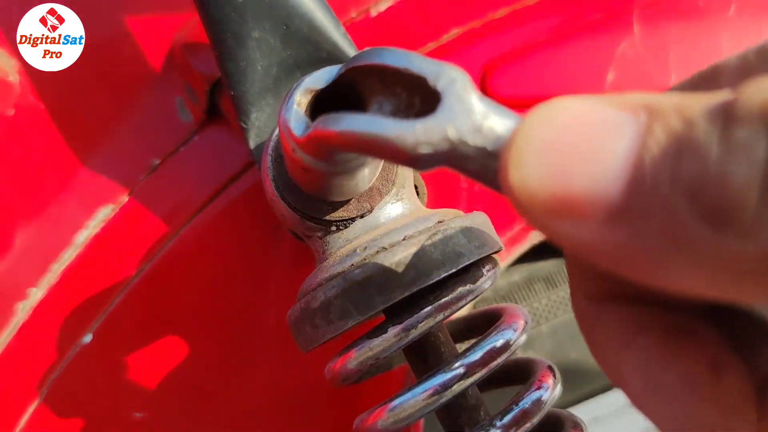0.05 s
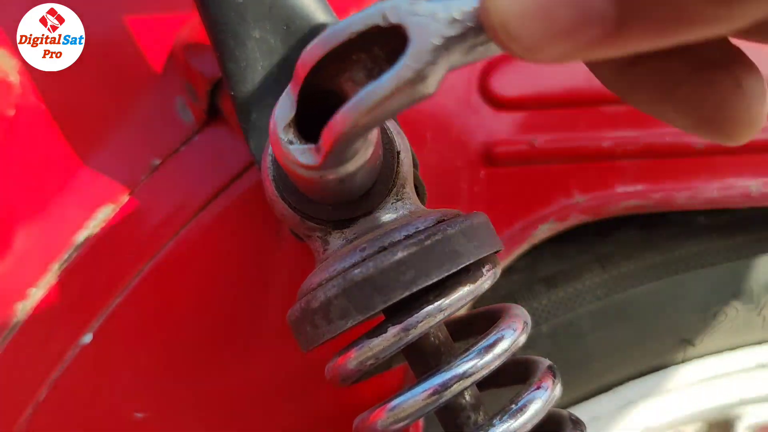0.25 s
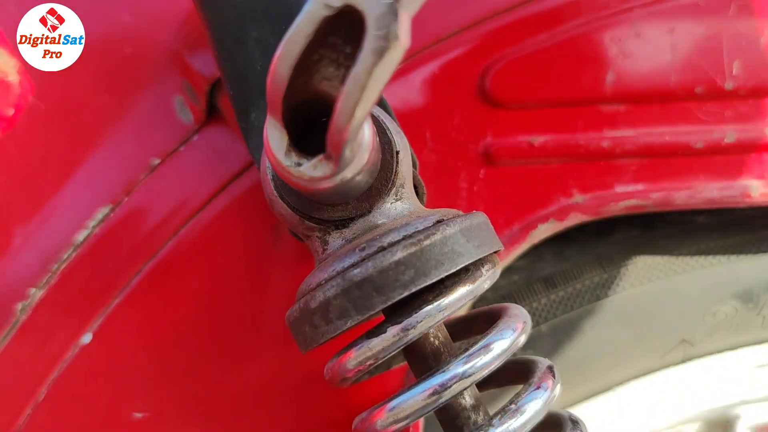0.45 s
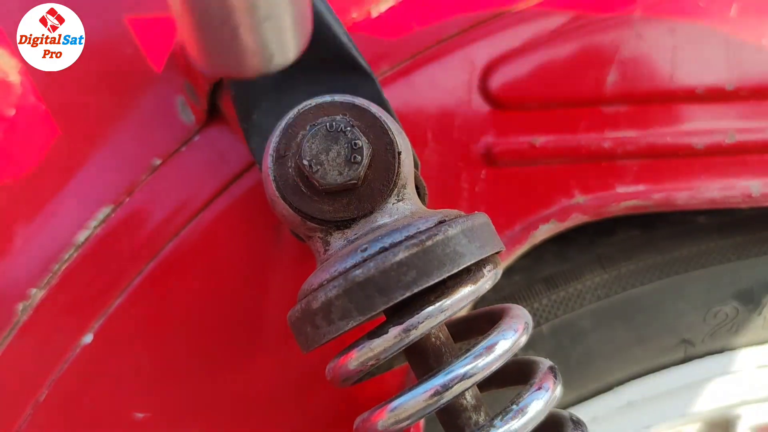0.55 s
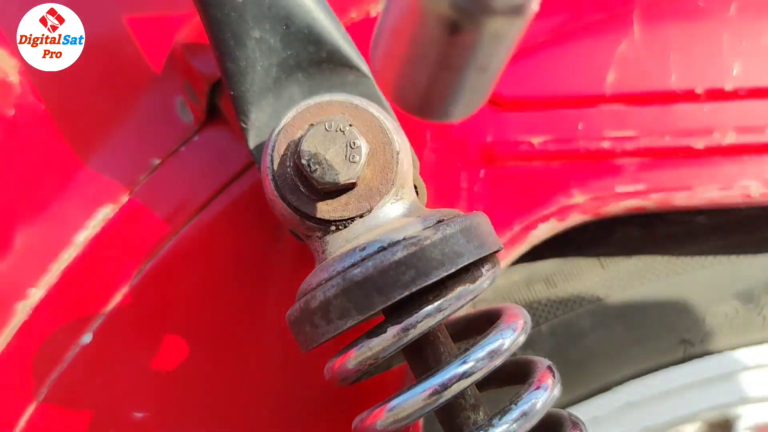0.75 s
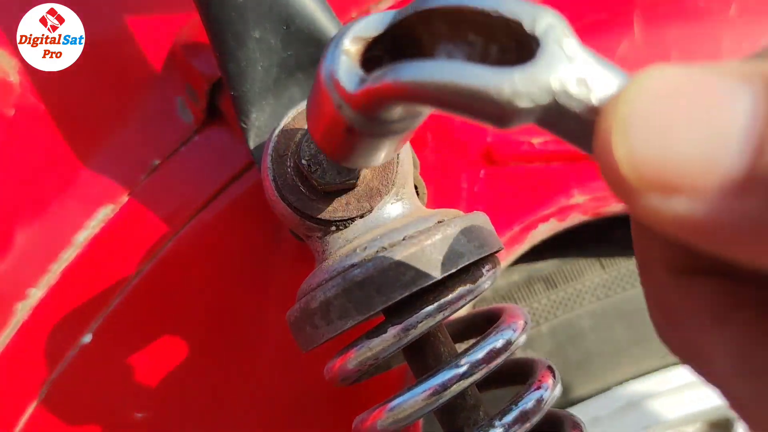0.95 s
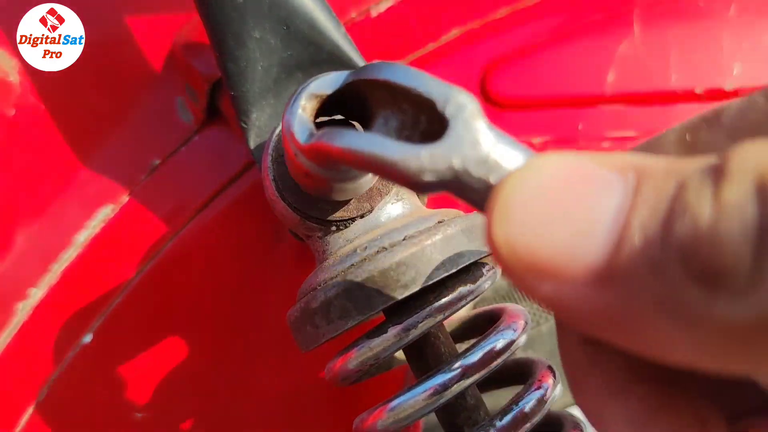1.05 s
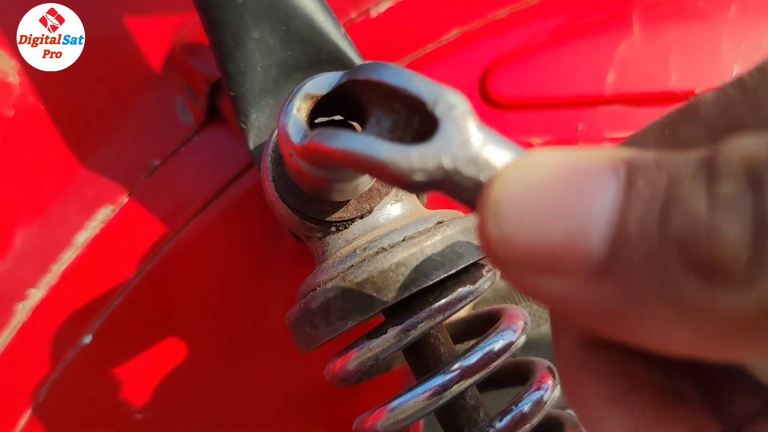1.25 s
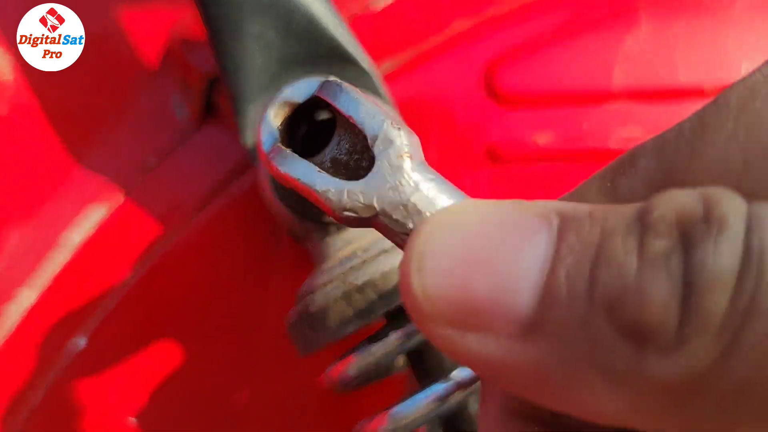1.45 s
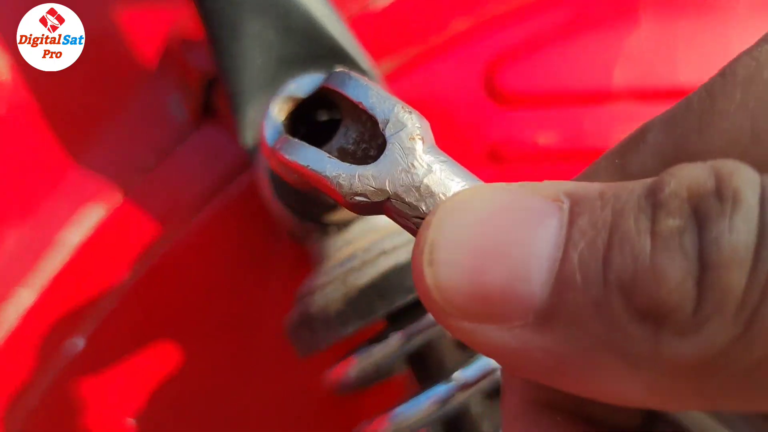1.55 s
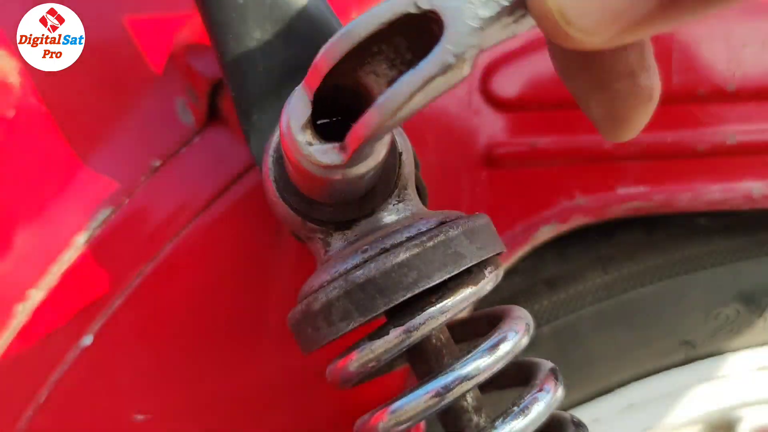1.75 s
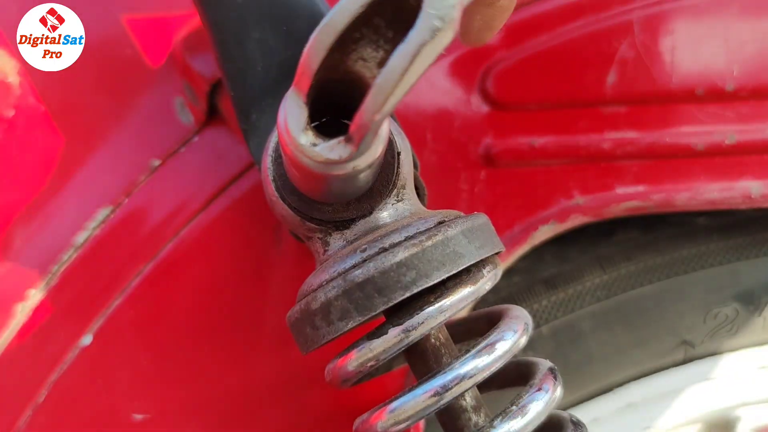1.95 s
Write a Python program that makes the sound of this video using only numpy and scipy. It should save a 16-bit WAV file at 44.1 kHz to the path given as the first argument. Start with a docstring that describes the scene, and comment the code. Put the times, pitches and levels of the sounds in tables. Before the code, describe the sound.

A socket spanner works on a vehicle nut, juddering and knocking a hollow panel, then after a brief dropout clanks back on loudly, with faint scrapes and knocks after; close stereo phone microphone, small workshop echo, low rumble.

```python
"""A socket spanner turns the nut on a scooter's shock absorber, close to a phone in a workshop.
The socket judders on the nut in runs of pulses that drum the body panel. It clinks as it is lifted off
and clanks back on: each blow rings the steel and the panel. Steel scrapes softly as filtered grains.
Faint hums swell over a steady noise rumble; bodywork and room echo the tool.
The sound drops out briefly in the middle."""
import sys
import numpy as np
from scipy import signal
from scipy.fft import rfft, irfft
from scipy.io import wavfile
from scipy.ndimage import uniform_filter1d, map_coordinates

SR = 44100
rng = np.random.default_rng(int(sys.argv[2]) if len(sys.argv) > 2 else 0)


def materialize(psi):
    """Save the field psi as 16-bit PCM at rate SR to the path in sys.argv[1].

    A 1-D psi becomes a single channel; in a 2-D psi each row is a channel.
    """
    bounded = np.clip(np.atleast_2d(psi).T, -1, 1)
    quanta = np.round(bounded * 32767).astype(np.int16)
    wavfile.write(sys.argv[1], SR, quanta)


N = 88244  # length of the scene [samples]


def db_to_gain(db):
    """Turn decibels into a plain multiplier."""
    return 10 ** (np.asarray(db) / 20)


def level(x, db):
    """Set the rms level of a steady sound."""
    return x * db_to_gain(db) / np.sqrt(np.mean(x ** 2))


def blow(x, db):
    """Give a short sound the energy that 10 ms of steady sound at this level would have."""
    return x * db_to_gain(db) * np.sqrt(0.010 * SR / np.sum(x ** 2))


def add(out, x, start):
    """Mix a sound in at a time [s]; whatever falls outside the scene is cut off."""
    i = int(start * SR)
    x, i = x[max(-i, 0):], max(i, 0)
    out[i:i + len(x)] += x[:len(out) - i]


def half_second():
    """Time axis [s] for one short sound."""
    return np.arange(SR // 2) / SR


def colour(x, points):
    """Shape the spectrum through (frequency [Hz], level [dB]) points without smearing sound ahead in time."""
    size = 2048
    hz, db = np.array(points).T
    log_hz = np.log(np.fft.rfftfreq(size, 1 / SR) + 1)
    gain = db_to_gain(np.interp(log_hz, np.log(hz), db))
    # folding the cepstrum makes the filter minimum phase: it answers at once
    cepstrum = irfft(np.log(gain))
    cepstrum[1:size // 2] *= 2
    cepstrum[size // 2 + 1:] = 0
    response = irfft(np.exp(rfft(cepstrum)))
    return signal.fftconvolve(x, response)[:len(x)]


def ring(x, modes):
    """Drive an object's modes: each is a sine that dies away by 60 dB in its own time."""
    t = half_second()
    response = np.zeros(len(t))
    for k, (hz, db, t60) in enumerate(modes):
        sign = (-1) ** k  # neighbouring modes start in opposite directions
        response += sign * db_to_gain(db - 60 * t / t60) * np.sin(2 * np.pi * hz * t)
    return signal.fftconvolve(x, response)[:len(x)]


def grains(size, rate):
    """Tiny impacts at random times, of either sign and uneven strength; rate is the mean per second."""
    hits = rng.random(size) < rate / SR
    signs = rng.choice([-1, 1], size)
    strengths = db_to_gain(2 * rng.standard_normal(size))  # 2 dB spread
    return level(hits * signs * strengths, 0)


def swell(middle, half):
    """A smooth bell-shaped rise and fall over time."""
    return np.exp(-2 * ((np.arange(N) / SR - middle) / half) ** 2)


# modes of the body panel and frame: (frequency [Hz], relative level [dB], time to fall 60 dB [s])
PANEL_MODES = [(235, -14, .16), (462, 0, .11), (500, -1, .13), (530, -8, .11), (565, -9, .14),
               (620, -1, .14), (700, -6, .09), (778, -4, .1), (834, -7, .16), (915, -12, .12),
               (1035, -8, .15), (1170, -11, .1), (1265, -10, .1), (1410, -16, .1)]
# modes of the spanner and socket: (frequency [Hz], relative level [dB], time to fall 60 dB [s])
STEEL_MODES = [(2040, -17, .11), (2220, -12, .07), (2380, -3, .07), (2645, 0, .035), (2930, -3, .045),
               (3155, -4, .05), (3400, -3, .035), (3840, 1, .045), (4150, -6, .035), (4900, -9, .035),
               (5170, -9, .035), (5800, -14, .035)]
# colour of the short tick of a blow: (frequency [Hz], relative level [dB])
TICK_COLOUR = [(300, -6.5), (1000, -10), (1800, -7), (2500, -0.5), (4000, 1), (5200, -3), (7000, -13.5),
               (8300, -9), (10000, -21.5), (15000, -23)]
# steel strikes steel; levels are relative:
# (time [s], chatter length [s], panel level [dB], steel level [dB], tick level [dB],
#  leading mode [Hz], leading mode level [dB])
CLINK_EVENTS = [(-0.03, 0.0027, -25.5, -56, -77, 834, -43), (0.109, 0.0043, -69, -66, -47, 3840, -50),
                (0.163, 0.0063, -34.5, -58, -43.5, 1035, -58),
                (0.5069, 0.0025, -49.5, -46.5, -54, 1035, -37), (0.511, 0.016, -39, -48.5, -40, 700, -39.5),
                (0.5145, 0.0081, -47, -52, -47, 530, -38.5), (1.06, 0.0054, -27.5, -23.5, -28.5, 620, -22),
                (1.065, 0.0054, -23.5, -20.5, -22.5, 3840, -23.5),
                (1.0712, 0.0063, -28.5, -32, -34.5, 834, -32.5),
                (1.094, 0.012, -34.5, -53, -44.5, 1035, -36.5), (1.5048, 0.0056, -45, -64, -59, 778, -41),
                (1.5166, 0.0074, -43.5, -48.5, -61, 778, -36)]
CHATTER_PER_S = 4100  # also the rate of the grit in a slip
CHATTER_DB = 5.5  # against the first hard contact


def clinks():
    """A hard contact and its chatter ring the steel and the panel; where the blow lands, one mode leads."""
    out, t = np.zeros(N), half_second()
    contact = 1. * (t == 0)
    for start, length, panel_db, steel_db, tick_db, lead_hz, lead_db in CLINK_EVENTS:
        chatter = grains(len(t), CHATTER_PER_S) * np.exp(-(t / length) ** 2)
        force = blow(chatter, CHATTER_DB) + blow(contact, 0)
        panel = blow(ring(force, PANEL_MODES), panel_db)
        steel = blow(ring(force, STEEL_MODES), steel_db)
        tick_noise = rng.standard_normal(len(t)) * np.exp(-t / length)
        tick = blow(colour(tick_noise, TICK_COLOUR), tick_db)
        lead_mode = min(PANEL_MODES + STEEL_MODES, key=lambda mode: abs(mode[0] - lead_hz))
        lead = blow(ring(contact, [lead_mode]), lead_db)
        add(out, panel + steel + tick + lead, start)
    return out


# colour of gritty contact, in scrapes and slips: (frequency [Hz], relative level [dB])
GRIT_COLOUR = [(60, -30), (120, -21), (220, -4), (330, -7), (520, -6), (750, 1.5), (1100, -4), (1600, -11),
               (2500, -13.5), (4000, -23), (7000, -30), (15000, -35.5)]
# colour of the sliding hiss: (frequency [Hz], relative level [dB])
HISS_COLOUR = [(500, -6.5), (2000, -4), (3200, -1.5), (4400, 0.5), (6500, -5), (8500, -2.5), (11000, -13.5),
               (15500, -13)]
# colour of the finest friction noise: (frequency [Hz], relative level [dB])
FIZZ_COLOUR = [(3000, -27), (6000, -14), (8000, 4.5), (10000, 4), (15000, -24)]
# steel slides on steel; levels are relative:
# (middle time [s], half length [s], panel level [dB], hiss level [dB], fizz level [dB])
SCRAPE_EVENTS = [(0.01, .06, -44, -75, -81), (0.102, 0.056, -43, -59.5, -59),
                 (0.15, 0.078, -55, -59.5, -68), (0.218, 0.0066, -70, -74, -56),
                 (0.30, 0.14, -58.5, -60.5, -65.5), (0.375, 0.026, -80, -75, -63),
                 (0.487, 0.052, -72, -63.5, -78), (0.514, 0.01, -42.5, -48, -46),
                 (0.57, 0.11, -60.5, -63.5, -83), (1.419, 0.058, -54.5, -72, -85),
                 (1.481, 0.033, -72, -61, -58.5), (1.526, 0.026, -50.5, -62, -62),
                 (1.779, 0.1, -67, -60, -62.5), (1.978, 0.026, -70, -83, -67)]
RUB_GRAINS_PER_S, HISS_GRAINS_PER_S = 2000, 9000


def scrapes():
    """Rough steel slides: tiny impacts make a grainy rub in the panel, a hiss and a fine fizz."""
    panel_rub = level(ring(grains(N, RUB_GRAINS_PER_S), PANEL_MODES), 0)
    grit = level(colour(grains(N, RUB_GRAINS_PER_S), GRIT_COLOUR), -10)
    rub = panel_rub + grit
    hiss = level(colour(grains(N, HISS_GRAINS_PER_S), HISS_COLOUR), 0)
    fizz = level(colour(grains(N, HISS_GRAINS_PER_S), FIZZ_COLOUR), 0)
    out = np.zeros(N)
    for middle, half, panel_db, hiss_db, fizz_db in SCRAPE_EVENTS:
        friction = db_to_gain(panel_db) * rub + db_to_gain(hiss_db) * hiss + db_to_gain(fizz_db) * fizz
        out += swell(middle, half) * friction
    return out


# colour of the background rumble: (frequency [Hz], relative level [dB])
AIR_COLOUR = [(20, -14.5), (40, -9), (70, 2), (125, 2), (170, -4), (270, -4.5), (420, -12.5), (1000, -23),
              (1600, -30.5), (4400, -33), (6500, -40.5), (10000, -35), (15500, -39)]
AIR_DB = -53  # rms over both sides, before the port colours
AIR_SPREAD_HZ = 790  # the two sides grow more different above this


def air():
    """Steady background rumble from coloured noise, nearly alike on both sides in the bass."""
    mid = colour(rng.standard_normal(N), AIR_COLOUR)
    side = colour(rng.standard_normal(N), AIR_COLOUR)
    low_cut = signal.butter(1, AIR_SPREAD_HZ, "high", fs=SR, output="sos")
    side = 0.083 * side + 1.03 * signal.sosfilt(low_cut, side)
    return level(np.array([mid + side, mid - side]), AIR_DB)


# the socket slips on the nut; levels are relative:
# (time [s], length [s], judder rate [Hz], panel level [dB], grit level [dB])
SLIP_EVENTS = [(0.083, 0.0214, 507, -42.5, -56), (0.1138, 0.0184, 495, -22, -29),
               (0.145, 0.0014, 480, -44, -40.5), (0.157, 0.0083, 473, -41.5, -46),
               (0.1672, 0.0035, 494, -26.5, -40), (0.196, 0.0098, 440, -49, -50),
               (1.0687, 0.0086, 468, -21.5, -35), (1.087, .012, 614, -26, -35.5),
               (1.384, .004, 560, -45, -57), (1.411, 0.0144, 497, -43.5, -56.5),
               (1.434, 0.0054, 550, -43, -59), (1.46, 0.0093, 505, -45.5, -74),
               (1.5091, 0.0068, 531, -32.5, -51), (1.5141, 0.012, 505.4, -24, -36.5),
               (1.862, 0.011, 460, -45, -73)]
JUDDER_JITTER = 0.045  # spread of the gaps between pulses [share of a gap]
JUDDER_SCATTER_DB = -0.5  # random spread of the pulse strengths [dB]; the sign makes no difference
BREAKAWAY_DB = 3  # boost of the first pulse, as the socket breaks away
PANEL_RING_DB = -9.5  # panel modes against the drumming at the judder rate
GRIT_DECAY_S = 0.019  # fall to about a third once the slip is over


def slips():
    """Short runs of stick-slip pulses drum the panel, with a crunch of grit."""
    out, t = np.zeros(N), half_second()
    for start, length, hz, panel_db, grit_db in SLIP_EVENTS:
        gap_chance, size_chance = rng.standard_normal((16, 2)).T  # up to 16 pulses
        times = np.cumsum(1 + JUDDER_JITTER * gap_chance) / hz
        boost_db = BREAKAWAY_DB * (times == times[0])
        sizes = db_to_gain(JUDDER_SCATTER_DB * size_chance + boost_db)
        pulses = np.zeros(len(t))
        for when, size in zip(times - times[0], sizes):
            still_slipping = np.clip((length - when) * hz, 0, 1)
            add(pulses, np.hanning(SR // 700) * size * still_slipping, when)
        drum = signal.lfilter(*signal.iirpeak(hz, 1.3, fs=SR), pulses)
        panel = blow(ring(pulses, PANEL_MODES), PANEL_RING_DB) + blow(drum, 0)
        grit_fade = np.exp(-np.maximum(t - length, 0) / GRIT_DECAY_S)
        grit = colour(grains(len(t), CHATTER_PER_S) * grit_fade, GRIT_COLOUR)
        add(out, blow(panel, panel_db) + blow(grit, grit_db), start)
    return out


# a faint low hum swells, level at its middle before the port colours:
# (middle time [s], half length [s], pitch [Hz], level [dB])
HUM_EVENTS = [(0.247, 0.13, 279, -53.5), (1.326, 0.079, 273, -50), (1.57, 0.044, 232.3, -49.5),
              (1.716, 0.043, 276, -51)]


def hums():
    """A faint low tone, a plain sine, comes and goes."""
    t = np.arange(N) / SR
    out = np.zeros(N)
    for middle, half, hz, db in HUM_EVENTS:
        out += swell(middle, half) * level(np.sin(2 * np.pi * hz * t), db)
    return out


NEAR_DB, NEAR_DECAY_S, NEAR_HZ = -3.5, 0.0012, 750  # level before the low cut, decay, lower edge


def bodywork(x):
    """Very early reflections off the panel and the hand: a tiny burst of random echoes, new on each call."""
    t = np.arange(SR // 50) / SR
    scatter = rng.standard_normal(len(t)) * t * np.exp(-t / NEAR_DECAY_S)
    scatter = scatter / np.sqrt(np.sum(scatter ** 2))
    low_cut = signal.butter(2, NEAR_HZ, "high", fs=SR, output="sos")
    scatter = signal.sosfilt(low_cut, scatter)
    return db_to_gain(NEAR_DB) * signal.fftconvolve(x, scatter)[:N]


# workshop echo, band by band: (frequency [Hz], relative level [dB], time to fall 60 dB [s])
ROOM_BANDS = [(200, -0.5, 0.4), (446, -10.5, 0.29), (700, -3, 0.18), (1100, -5, 0.23), (2520, -11, 0.13),
              (5000, -14, 0.052), (11000, -19, 0.31)]
ROOM_DELAY_S = .004


def workshop(x):
    """Short diffuse echo from nearby surfaces, for one side: noise whose bands die away at their own pace."""
    t = half_second()
    noise = rfft(rng.standard_normal(len(t)))
    log_hz = np.log(np.fft.rfftfreq(len(t), 1 / SR) + 1)
    log_centres = np.log(np.array(ROOM_BANDS)[:, 0])
    tail = np.zeros(len(t))
    # each band's share is 1 at its own centre and 0 at the others
    for share, (hz, db, t60) in zip(np.eye(len(ROOM_BANDS)), ROOM_BANDS):
        band = irfft(noise * np.interp(log_hz, log_centres, share), len(t))
        fade = np.exp(-np.log(1000) * t / t60) * (t > ROOM_DELAY_S)
        tail += db_to_gain(db) * band * fade / np.sqrt(np.sum(fade ** 2))
    return signal.fftconvolve(x, tail)[:N]


PORT_LAG_S = .00009  # the left port hears the tool this much later
TOOL_DB = -2.5  # shared by all the tool's sounds and their echoes


def scene():
    """The tool's sound reaches the right port first; bodywork and room reflect it."""
    tool = slips() + clinks() + scrapes()
    late = map_coordinates(tool, [np.arange(N) - PORT_LAG_S * SR])
    sides = []
    for direct in (late, tool):  # left, right
        sides.append(db_to_gain(TOOL_DB) * (direct + bodywork(tool) + workshop(tool)))
    return np.array(sides) + hums() + air()


# colour of the left microphone port: (frequency [Hz], level [dB])
LEFT_PORT_COLOUR = [(100, -1.5), (220, 2), (450, 0), (1000, -0.5), (2000, 2), (5000, -1), (6800, -1.5),
                    (8150, 10), (9200, 0), (10800, -1), (12000, 6.5), (15000, -2)]
# colour of the right microphone port: (frequency [Hz], level [dB])
RIGHT_PORT_COLOUR = [(100, -1.5), (220, -2), (450, 0), (1000, -3.5), (2000, 1.5), (5000, 1), (6300, -0.5),
                     (7400, -13.5), (10000, -14.5), (12000, -5.5), (15000, 1)]
DROPOUT_START_S, DROPOUT_END_S, DROPOUT_DB = .899, .955, -52
TOP_HZ = 15900  # nearly nothing is left above this


def record(dry):
    """Each port colours the sound; it drops out briefly, and the top is cut."""
    t = np.arange(N) / SR
    dropped = (t > DROPOUT_START_S) & (t < DROPOUT_END_S)
    gain = np.where(dropped, db_to_gain(DROPOUT_DB), 1.)
    gain = uniform_filter1d(gain, size=128)  # soft edges of about 3 ms
    left = colour(dry[0], LEFT_PORT_COLOUR)
    right = colour(dry[1], RIGHT_PORT_COLOUR)
    heard = np.array([left, right]) * gain
    top_cut = signal.ellip(10, .2, 80, TOP_HZ, fs=SR, output="sos")
    return signal.sosfilt(top_cut, heard)


dry = scene()
out = record(dry)
materialize(out)
```